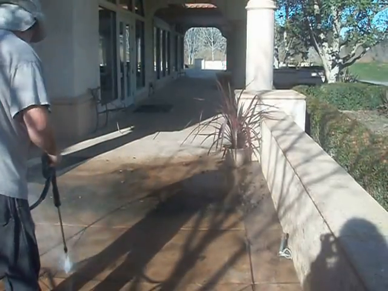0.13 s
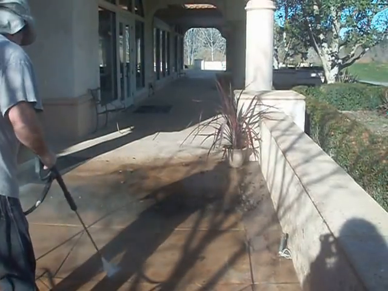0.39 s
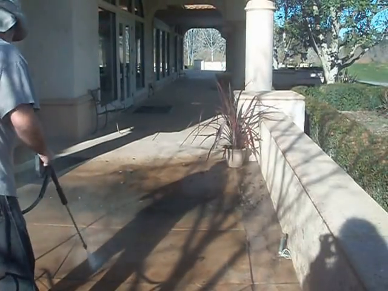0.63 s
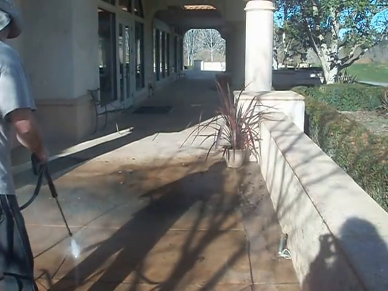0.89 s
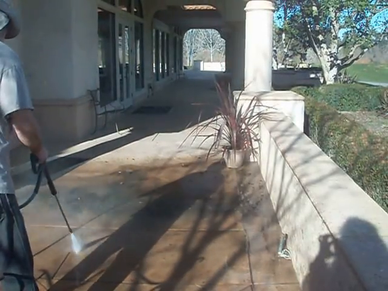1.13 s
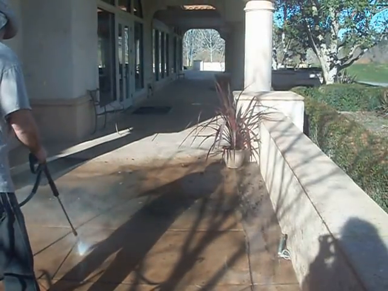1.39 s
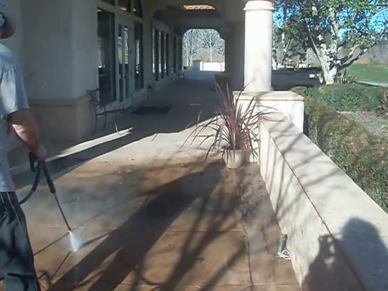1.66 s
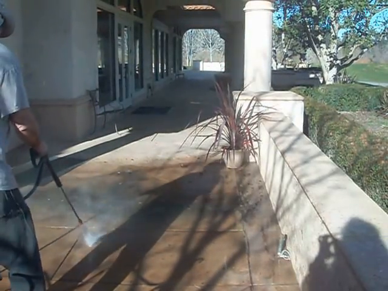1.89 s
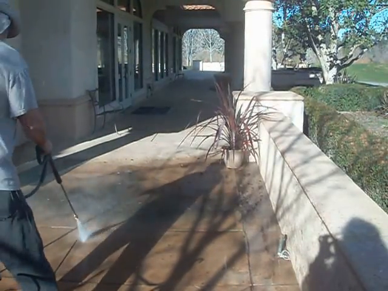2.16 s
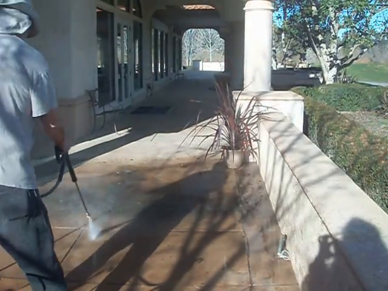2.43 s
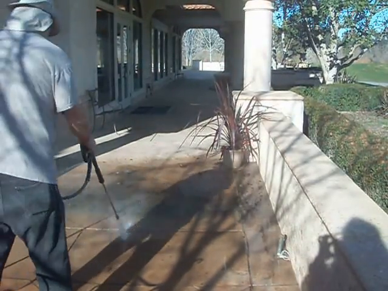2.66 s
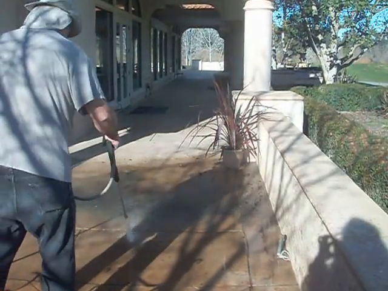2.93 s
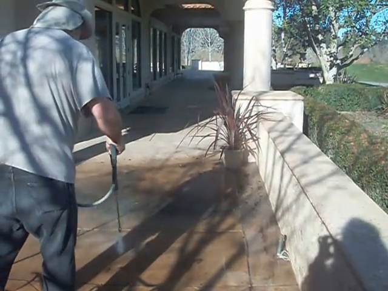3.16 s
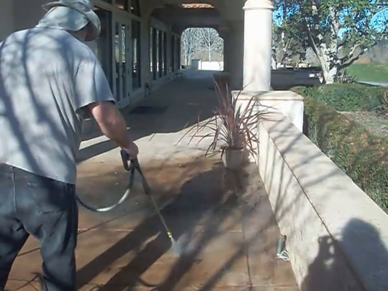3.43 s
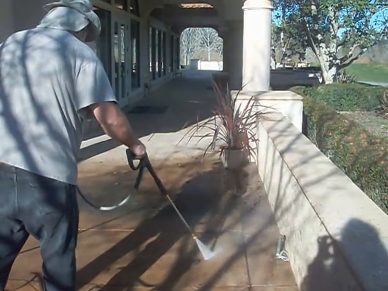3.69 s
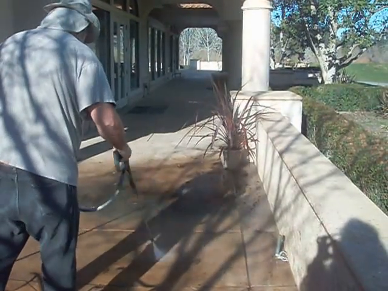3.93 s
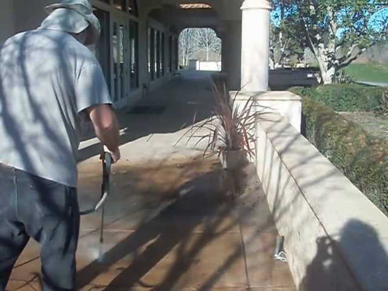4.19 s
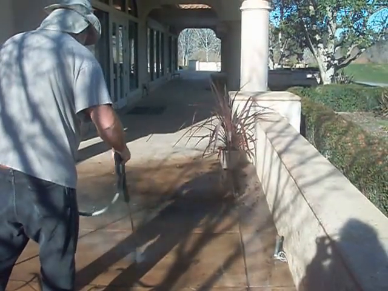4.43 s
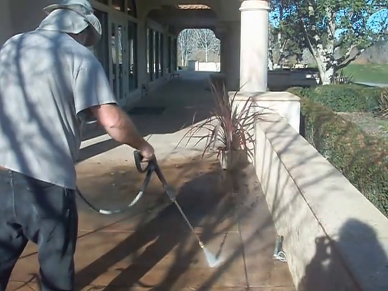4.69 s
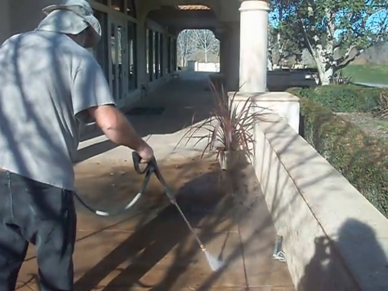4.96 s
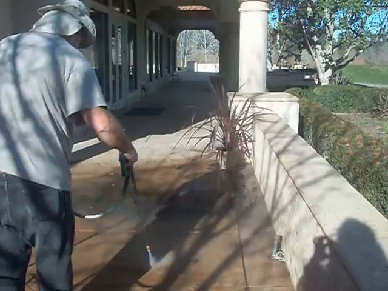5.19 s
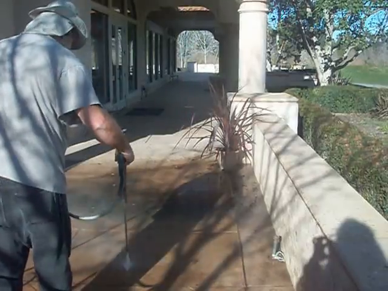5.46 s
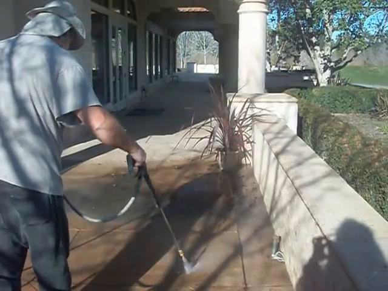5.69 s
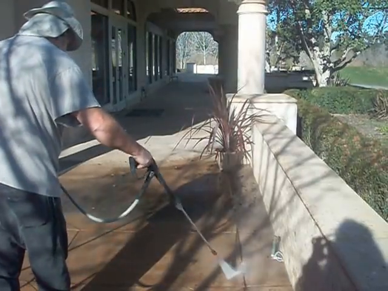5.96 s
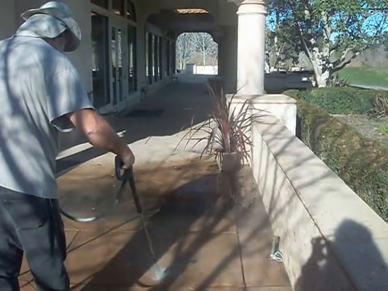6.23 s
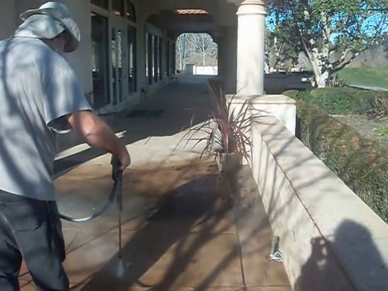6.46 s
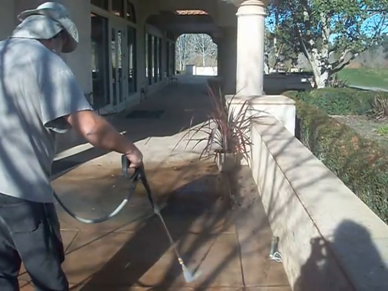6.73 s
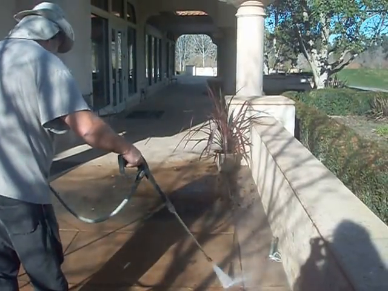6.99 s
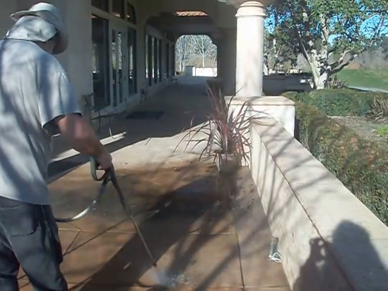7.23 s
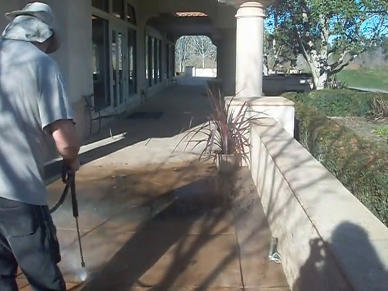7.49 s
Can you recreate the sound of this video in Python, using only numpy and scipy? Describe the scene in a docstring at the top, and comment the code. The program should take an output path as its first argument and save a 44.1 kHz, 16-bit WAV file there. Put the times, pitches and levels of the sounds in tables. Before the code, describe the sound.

A small petrol engine driving a pressure pump drones without pause, a dense low hum with fast firing throb, rough exhaust rush and rattling casing. Over it a water jet hisses steadily, its splash swelling about once a second in the later half. Outdoors under a covered walkway, picked up by a small, dull camera microphone with faint low wind rumble.

```python
"""Pressure washer under a covered walkway

A single-cylinder four-stroke engine drives a pressure pump at governed speed under a covered walkway, while a
lance sweeps a fan of water over the paving near a small camera. Firing, crank and plungers hum on multiples of
the engine cycle; filtered noise makes the rush of gas, fan air and casing, a few narrow bands of buzz, the
flickering hiss of the jet and the low rumble of a breeze."""
import sys
import numpy as np
from scipy import signal
from scipy.fft import rfft, irfft
from scipy.io import wavfile
from scipy.ndimage import uniform_filter1d

SR = 44100
rng = np.random.default_rng(int(sys.argv[2]) if len(sys.argv) > 2 else 0)


def how_loud(loudness_db):
    """Turn decibels into a plain amplitude multiplier (0 dB gives 1, 20 dB gives 10)."""
    steps = np.asarray(loudness_db, float) / 20
    return 10 ** steps


def to_wav(s):
    """Save 16-bit WAV."""
    ch = np.atleast_2d(s).T  # columns
    pcm = np.round(np.clip(ch, -1, 1) * 32767)  # PCM
    wavfile.write(sys.argv[1], SR, pcm.astype(np.int16))


N = 335601


def curve(table):
    """Columns of a table joined by straight lines in time."""
    s, *columns = np.transpose(table)
    return [np.interp(np.arange(N) / SR, s, c) for c in columns]


def unit(x):
    """Scaled to rms 1."""
    return x / np.sqrt(np.mean(x ** 2))


def walk(rate):
    """Random levels, each held for 1 / rate seconds and slewed twice; rms 1."""
    hold = int(SR / rate)
    levels = np.repeat(rng.standard_normal(N // hold + 1), hold)
    slewed = uniform_filter1d(uniform_filter1d(levels, hold), hold)
    return unit(slewed[:N])


def band(lo_hz, hi_hz, order=2):
    """Noise between two edges, rms 1."""
    sos = signal.butter(order, [lo_hz, hi_hz], "band", fs=SR, output="sos")
    return unit(signal.sosfilt(sos, rng.standard_normal(N)))


def swell(at_s, width_s):
    """A smooth rise to 1 and fall around a moment."""
    return np.exp(-((np.arange(N) / SR - at_s) / width_s) ** 2)


def engine_cycle():
    """Engine cycles completed so far, as the governor hunts around its speed."""
    # governed speed: (time [s], cycle rate [Hz])
    governed_speed = [(0.0, 29.43), (0.29, 29.228), (0.36, 29.328), (0.68, 29.245), (1.25, 29.275),
                      (1.67, 29.384), (2.17, 29.328), (2.41, 29.443), (2.79, 29.413), (2.95, 29.319),
                      (3.56, 29.406), (3.89, 29.131), (4.03, 29.457), (4.45, 29.255), (4.69, 29.584),
                      (4.81, 29.271), (5.32, 29.451), (5.59, 29.212), (5.84, 29.467), (6.32, 29.291),
                      (6.79, 29.362), (6.86, 29.095), (7.0, 29.333), (7.61, 29.43)]
    return np.cumsum(curve(governed_speed)[0]) / SR


def hum(cycle):
    """Three plungers sound on every third order, the crank on other even orders, firing on the other odd ones."""
    # tones of the machine, before they waver: (multiple of the cycle [1], level [dB rms])
    machine_orders = [(1, -34.5), (2, -18), (3, -16), (4, -40), (5, -38), (6, -22), (7, -28.5), (8, -28.5),
                      (9, -29), (10, -27.5), (11, -31), (12, -27.5), (13, -36), (14, -32.5), (15, -50),
                      (16, -29), (17, -32.5), (18, -29), (19, -31), (20, -36.5), (22, -39.5), (23, -48.5),
                      (24, -48), (27, -43.5), (28, -40.5), (30, -39), (33, -41), (34, -39.5), (35, -43.5),
                      (36, -45), (37, -40.5), (38, -45), (41, -45.5), (44, -41.5), (47, -36), (48, -25.5),
                      (49, -44.5), (50, -39.5), (51, -45), (52, -36), (56, -42), (57, -41), (62, -50.5),
                      (63, -53)]
    # pump load, a slow drift: (time [s], level [dB])
    pump_load = [(0.0, -.3), (.9, -.5), (2.1, -0.2), (2.7, .5), (3.9, 0.35), (5.2, 0.55), (6.9, -0.35),
                 (7.61, 0.1)]
    # cooling-fan whine, relative to its order: (time [s], level [dB])
    fan_whine = [(0.0, 2), (.59, 2.5), (1.2, -0.3), (2.1, 0), (2.45, 3), (2.9, -2), (3.2, 1.1),
                 (4.35, -0.1), (4.7, 0.6), (6.0, 1.5), (6.4, .1), (6.68, 2.2), (6.9, -1), (7.2, 1.4),
                 (7.61, 0.2)]
    # the ninth and eighteenth orders swell and fade together: (time [s], level [dB])
    ninth_orders = [(0.0, -1.5), (2.1, -1.5), (3.0, 1.2), (3.9, 3), (5.5, 0.5), (6.4, -1), (7.61, -1)]
    fan_order = 48
    # (place in the cycle [cycles], smear by pipe and walls [cycles per order squared], phase offset [cycles])
    plungers, crank, firing = (.2322, -.0163, -.497), (.6086, .0152, -.13), (.4484, -.0286, .015)

    load_db = curve(pump_load)[0]
    ninths_db = curve(ninth_orders)[0]
    bark_db = .5 * walk(25)  # no two firings are quite alike; the crank orders share this waver
    whine_db = curve(fan_whine)[0] + 0.4 * walk(30)
    tones = 0
    for k, order_db in machine_orders:
        if k % 3 == 0:
            place, smear, offset = plungers
            # load sharpens the plunger strokes, so their upper orders follow it most
            waver_db = load_db * min(0.089 * k, 2.5)
        else:
            place, smear, offset = crank if k % 2 == 0 else firing
            waver_db = bark_db * (k > 5)
        if k in (9, 18):
            waver_db = ninths_db
        if k == fan_order:
            waver_db = whine_db
        else:
            waver_db = waver_db + .5 * walk(2) * (k > 5)
        # uneven crank speed blurs the higher orders most
        shake = 0.0018 * k * walk(20)
        turns = k * (cycle - place) - smear * k * k + offset + shake
        tones = tones + how_loud(order_db + waver_db) * np.cos(2 * np.pi * turns)
    return np.sqrt(2) * tones


def rush(cycle):
    """Broad noise of gas, fan air and casing; a puff of gas lifts its middle once a cycle."""
    # relative spectrum of the rush: (frequency [Hz], level per hertz [dB])
    rush_spectrum = [(45, -6.5), (90, -1), (125, -0.5), (180, -1.5), (320, -2.5), (600, -2.5), (800, 0.5),
                     (1150, 2), (1450, -3.5), (1900, -15.5), (3000, -7.5)]
    bin_hz = np.maximum(np.fft.rfftfreq(N, 1 / SR), 1)
    point_hz, point_db = np.transpose(rush_spectrum)
    # joined along log frequency: the table is sparse at the top
    shape_db = np.interp(np.log(bin_hz), np.log(point_hz), point_db, left=-40, right=-60)
    steady = unit(irfft(rfft(rng.standard_normal(N)) * how_loud(shape_db), N))
    puff_gain = np.exp(-((cycle % 1 - .8) / 0.028) ** 2)  # place and width in cycles
    puff = puff_gain * band(650, 1300)
    gain = how_loud(-24.5 + 0.51 * walk(4.1))
    return gain * (steady + how_loud(1.5) * puff)


def narrow_buzz():
    """Narrow bands of buzz, each wavering slowly in level."""
    # narrow buzz bands, before they waver: (centre [Hz], width [Hz], level [dB rms])
    buzz_bands = [(768, 30, -42), (1048, 60, -40.5), (1438, 16, -37), (1854, 39, -47), (2797, 140, -42.5)]
    buzz = 0
    for hz, width_hz, panel_db in buzz_bands:
        gain = how_loud(panel_db + 2.0 * walk(3))
        buzz = buzz + gain * band(hz - width_hz / 2, hz + width_hz / 2)
    return buzz


def jet(cycle):
    """Bands of hiss flicker alone as the fan of water crosses rough stone; lower ones carry splash and runoff."""
    # relative level of the hiss as the worker walks about: (time [s], level [dB])
    lance_hiss = [(0.0, -24), (1.6, -24.5), (2.9, -26.5), (3.6, -24.5), (4.7, -23.5), (5.1, -24.5),
                  (5.5, -23.5), (7.61, -22.5)]
    # the lance swings out towards the low wall and the splash swells: (time [s], rise [dB])
    lance_swings = [(3.95, 3), (5.05, 3), (6.1, 3.5), (7.15, 3.7)]
    hiss_db = curve(lance_hiss)[0]
    splash_db = -26 + sum(rise_db * swell(s, 0.25) for s, rise_db in lance_swings)
    surge = walk(9)  # shared by all bands
    # each of three plunger strokes a cycle pushes the pressure up
    stroke_db = 0.77 * np.cos(2 * np.pi * 3 * (cycle - .1))
    runoff_db = -26 + stroke_db
    water = 0
    for hz in np.arange(1500, 6000, 400):
        splash_share = np.exp(-((hz - 3000) / 750) ** 2)
        runoff_share = np.clip((2700 - hz) / 600, 0, 1)
        # each band leans towards the level of the part that covers it
        band_db = hiss_db + splash_share * (splash_db - hiss_db) + runoff_share * (runoff_db - hiss_db)
        tilt_db = -5.0 - 0.31 * np.log2(hz / 4000)
        flicker_db = 0.27 * surge + 0.58 * walk(6)
        water = water + how_loud(band_db + tilt_db + flicker_db) * band(hz - 200, hz + 200)
    return water


def breeze():
    """Slow pressure wobble on the microphone, below the hum: restless calm air and short gusts."""
    # gusts added to the calm air: (time [s], peak level [dB])
    mic_gusts = [(.48, -30), (1.14, -32.5), (2.7, -35), (3.01, -31), (3.43, -24), (3.77, -33), (4.22, -33),
                 (4.45, -31.5), (4.87, -36)]
    calm = how_loud(-40.5 + 4.0 * walk(4.5))
    gusts = sum(how_loud(peak_db) * swell(s, 0.082) for s, peak_db in mic_gusts)
    return (calm + gusts) * band(5.5, 32)


def scene():
    """Machine, jet and air added at one microphone."""
    cycle = engine_cycle()
    mix = hum(cycle) + rush(cycle) + narrow_buzz() + jet(cycle) + breeze()
    return mix[None]


def low_pass(x):
    """Removes everything above the highest recorded frequency."""
    return signal.sosfilt(signal.butter(12, 7120, fs=SR, output="sos"), x)


def record(dry):
    """The camera samples slowly; a leaky smoothing filter lets a mirror of the top through; peaks clip."""
    camera_hz, ceiling = 11025, .99
    step = SR // camera_hz
    guard = signal.firwin(numtaps=161, cutoff=5330, window=("kaiser", 6.0), fs=SR)
    guarded = np.convolve(dry[0], guard, "same")
    # one sample kept in each step, zeros between
    sparse = np.zeros(N)
    sparse[::step] = step * guarded[::step]
    smooth = signal.firwin(numtaps=67, cutoff=5500, window=("kaiser", 9.0), fs=SR)
    offset = -.0037  # constant shift of the waveform
    mix = np.clip(np.convolve(sparse, smooth, "same") + offset, -ceiling, ceiling)
    return low_pass(mix[None])


dry = scene()
out = record(dry)
to_wav(out)
```